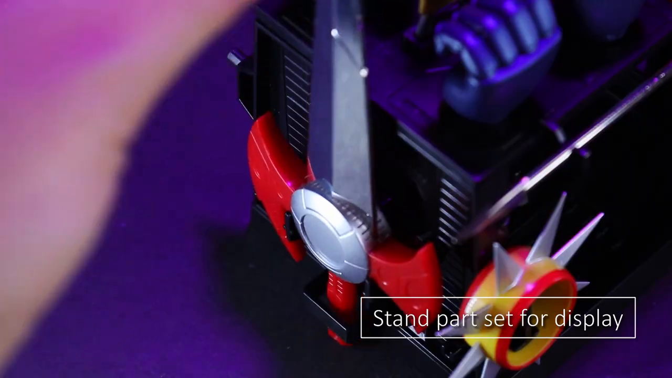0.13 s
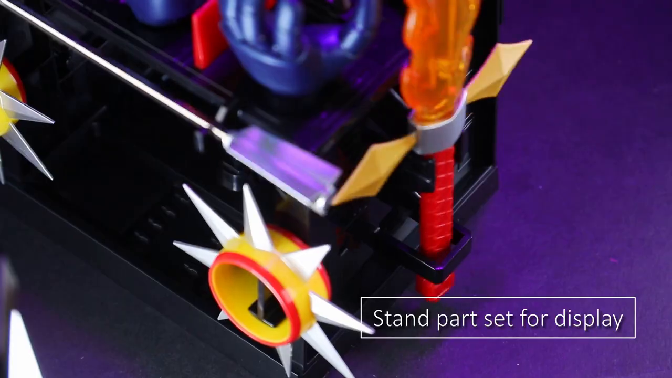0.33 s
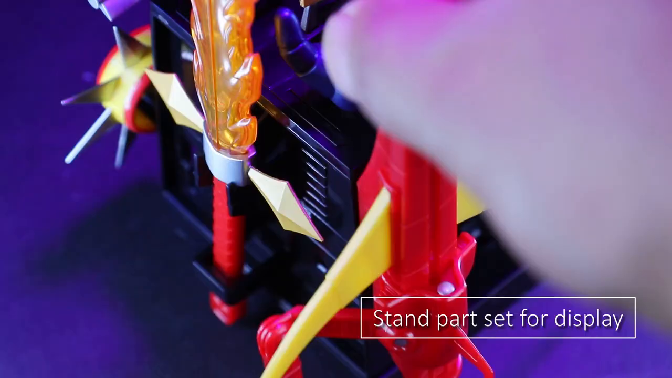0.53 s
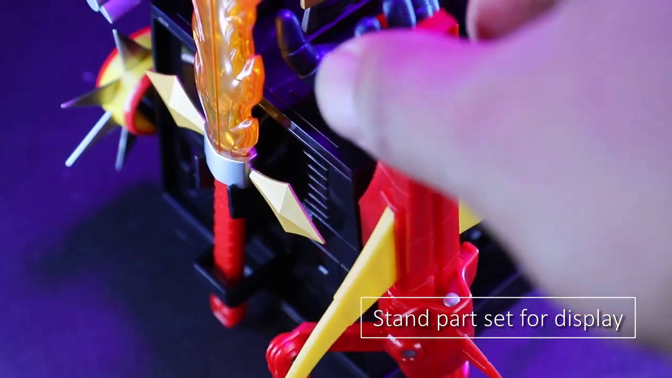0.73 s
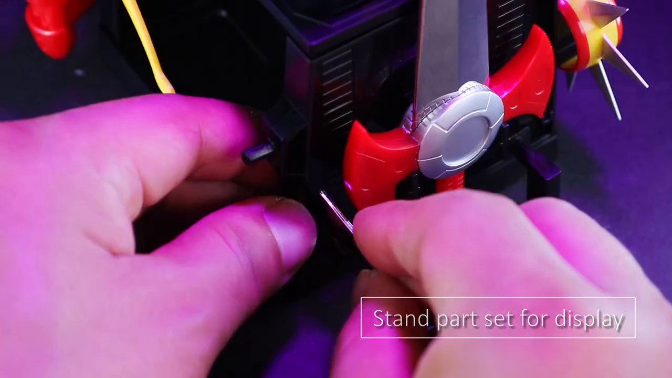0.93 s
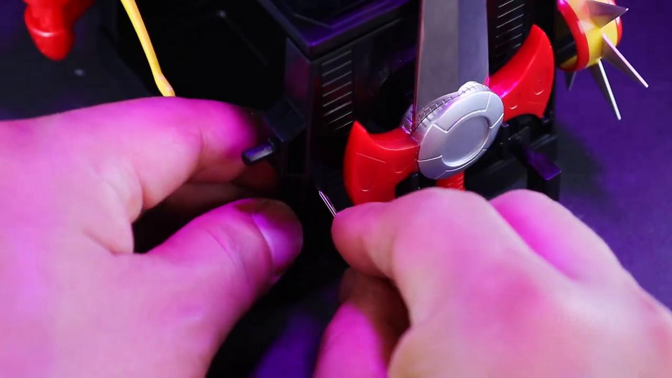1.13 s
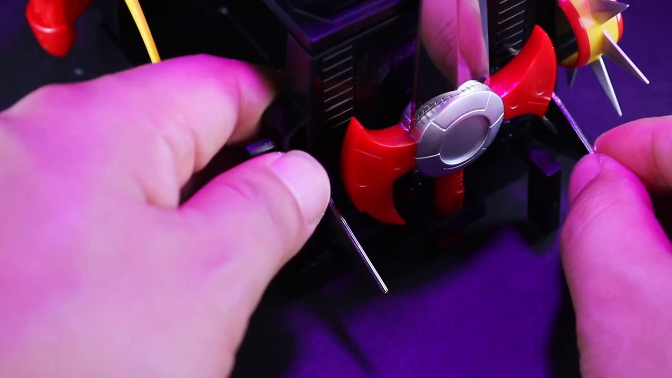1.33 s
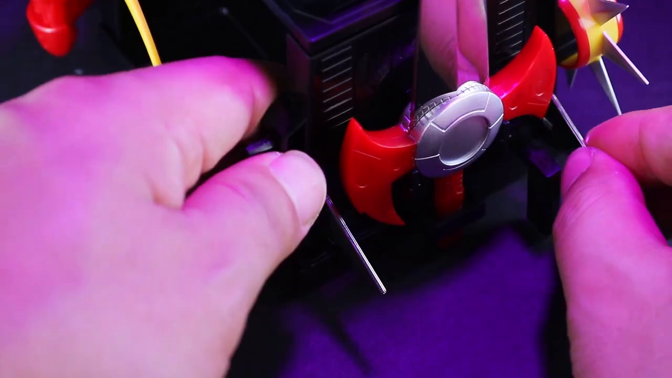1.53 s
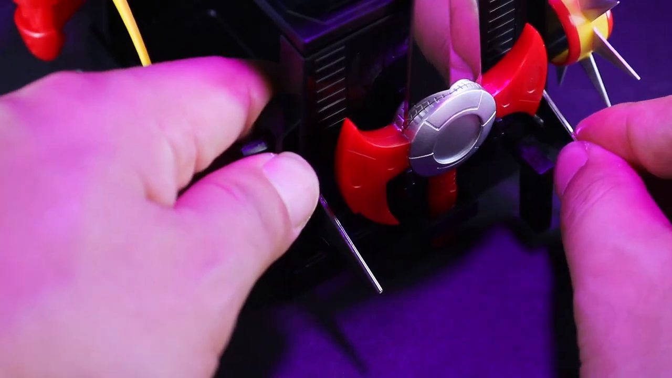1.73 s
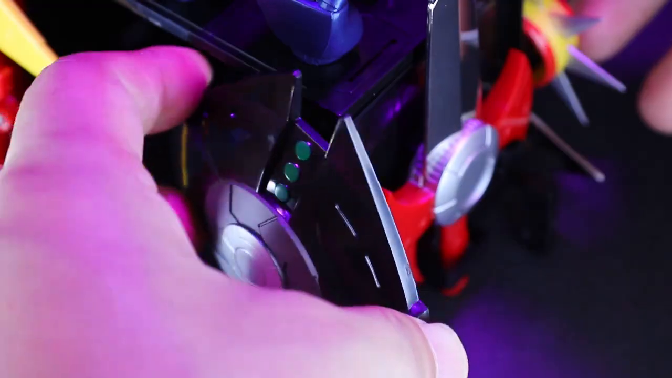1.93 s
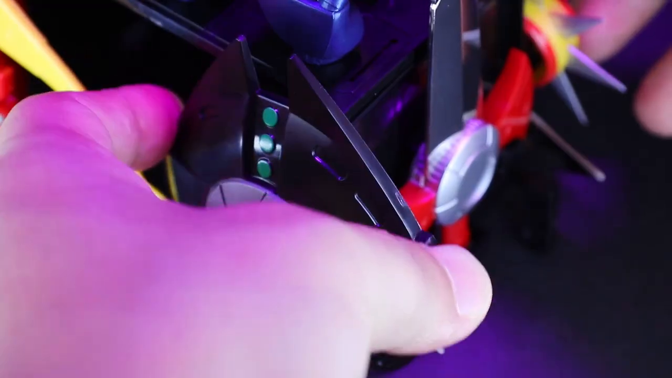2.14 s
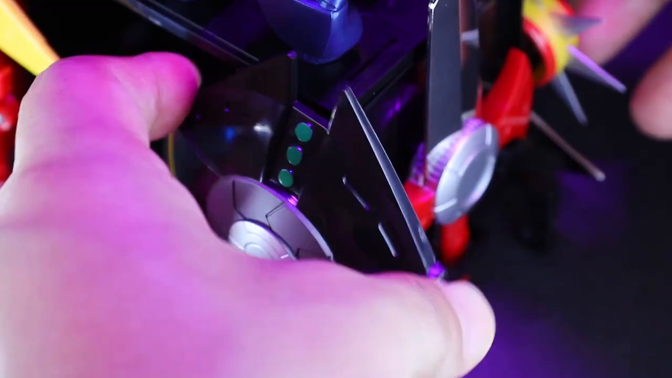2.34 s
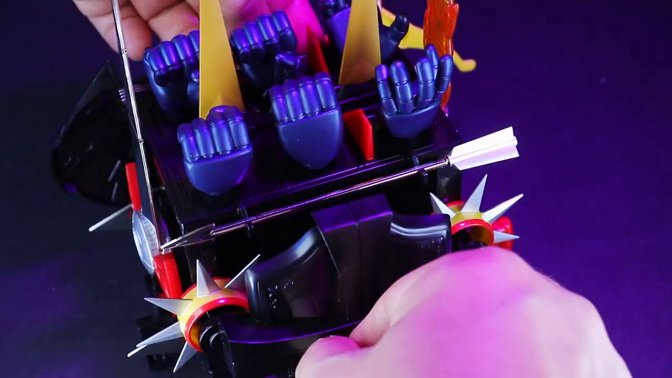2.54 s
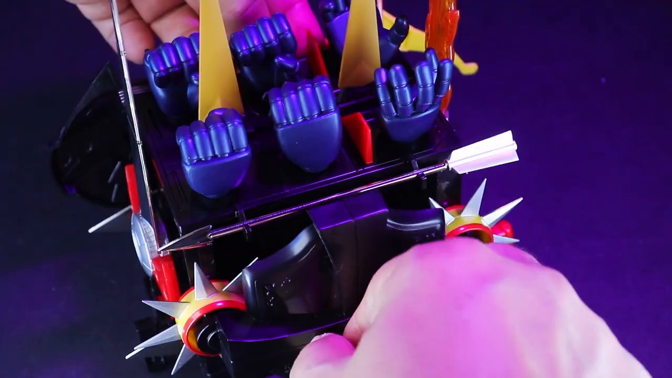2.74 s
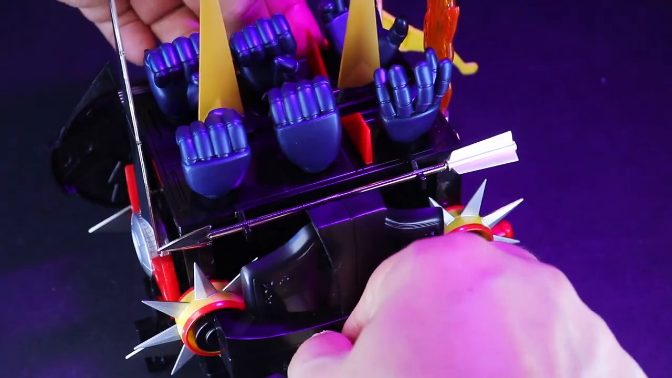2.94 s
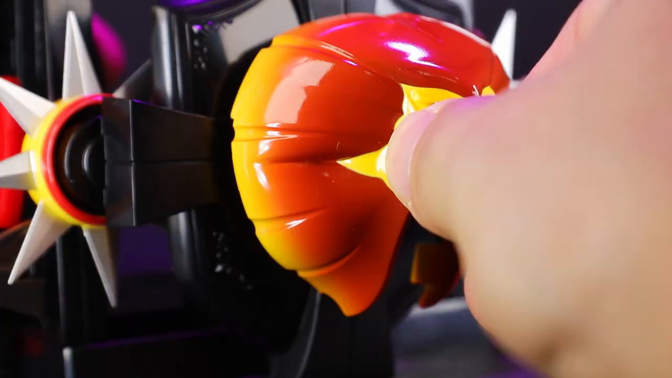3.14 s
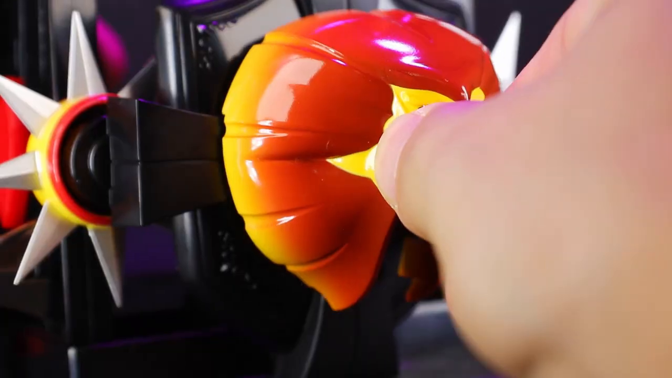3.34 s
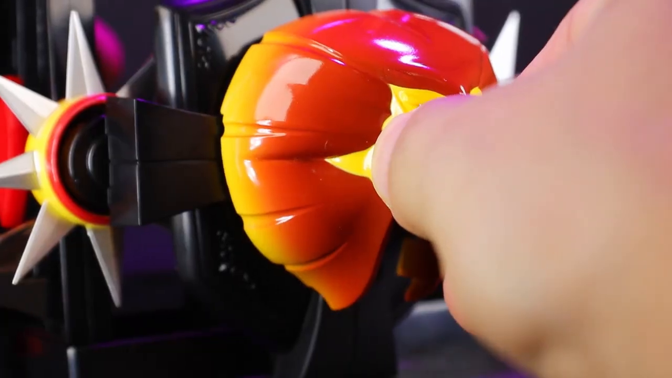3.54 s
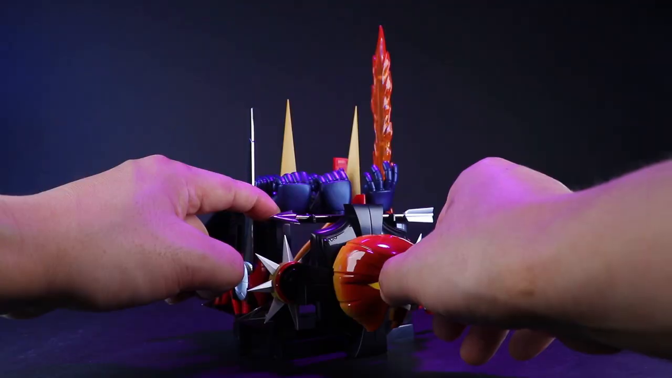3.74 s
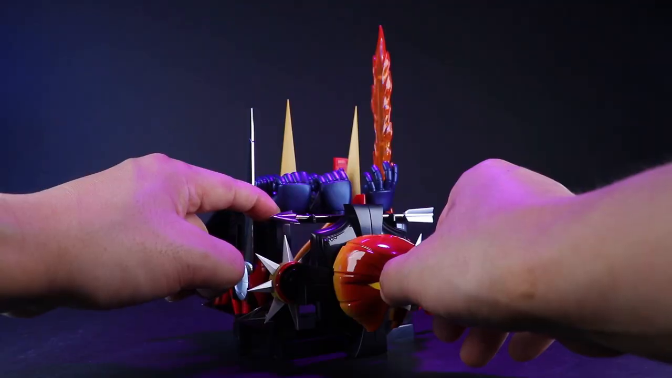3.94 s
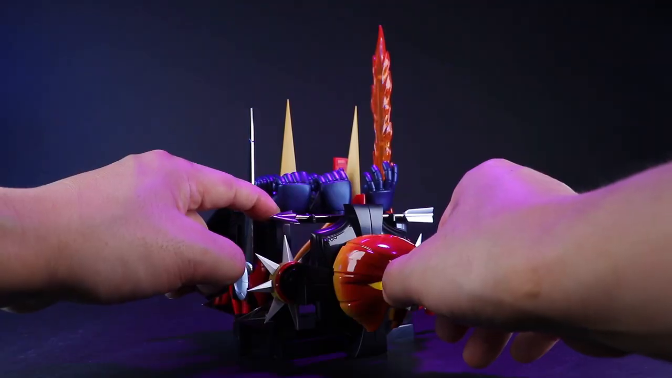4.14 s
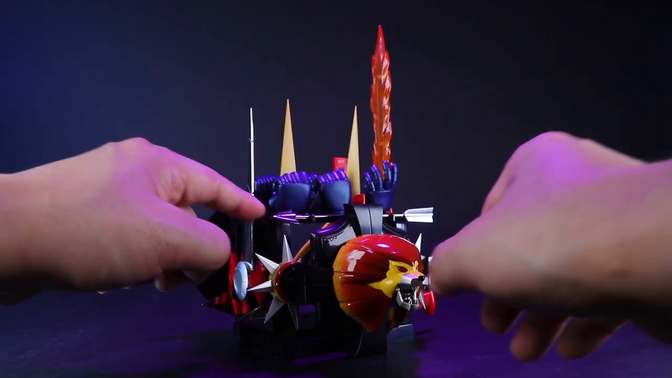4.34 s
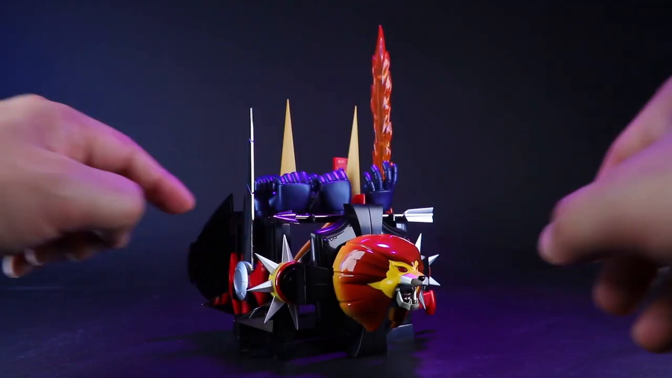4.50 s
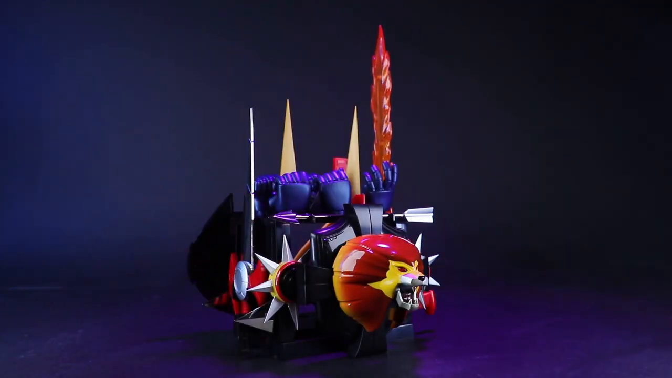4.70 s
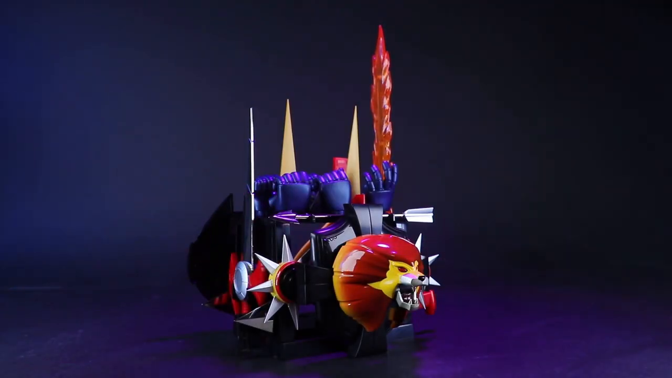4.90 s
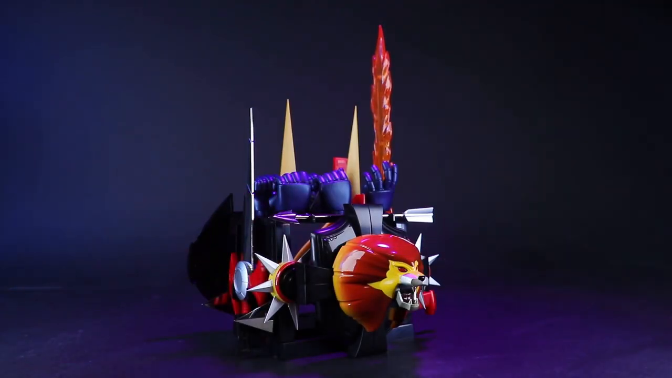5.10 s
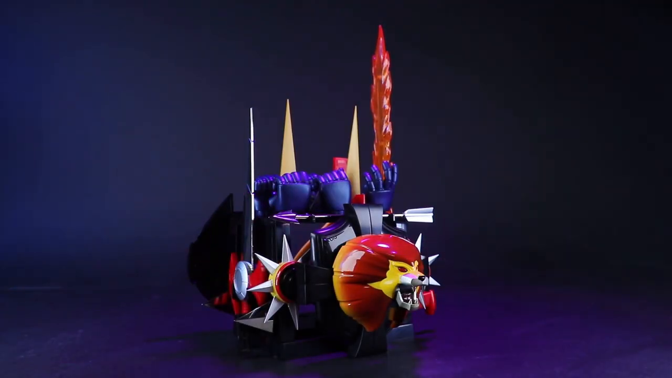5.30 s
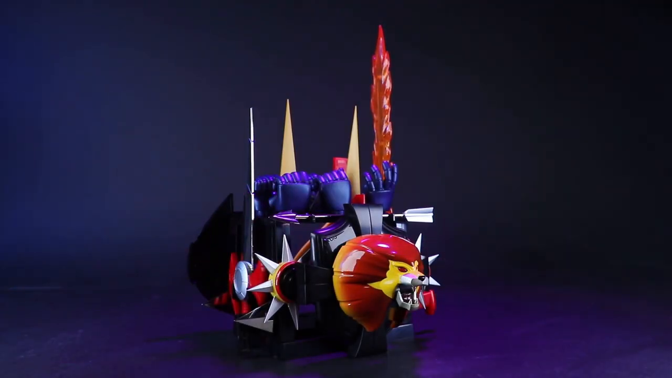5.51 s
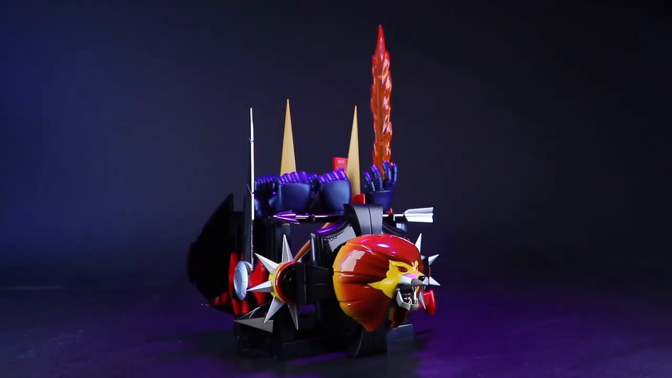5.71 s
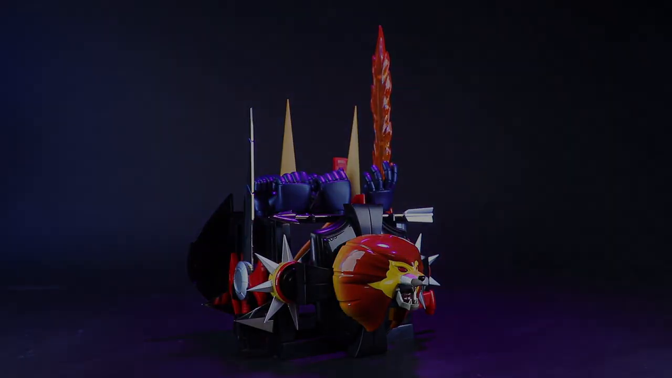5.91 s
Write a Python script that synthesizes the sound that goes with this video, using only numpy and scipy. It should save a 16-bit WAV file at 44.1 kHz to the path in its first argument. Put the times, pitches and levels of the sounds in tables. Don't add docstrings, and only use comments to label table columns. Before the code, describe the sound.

Close, dry clacks of toy weapons and a figure head fitted to a plastic stand, with faint finger rubs, fading to near silence.

```python
import sys
import numpy as np
from scipy import signal
from scipy.fft import rfft, irfft
from scipy.io import wavfile
from scipy.ndimage import uniform_filter1d

SR = 44100
rng = np.random.default_rng(int(sys.argv[2]) if len(sys.argv) > 2 else 0)


def ratio_of_db(decibels):
    return 10 ** (np.asarray(decibels, float) / 20)


def master_out(mix):
    frames = np.transpose(np.atleast_2d(mix))
    ceiling = np.clip(frames, -1, 1)
    pcm = np.round(ceiling * 32767).astype(np.int16)
    wavfile.write(sys.argv[1], SR, pcm)


N = 267231
T = np.arange(N) / SR

# start t/s, hush gain/dB
TAKES = [(0, 0), (.19, 0), (.70, 0), (.98, 0), (1.395, -.5), (1.888, 0), (2.63, 0), (3.195, 0), (3.66, -1),
         (4.5, -1.5)]
# t/s, part peak level/dB, stand over part/dB,
# brightness over part/dB
SNAPS = [(0.001, -34.5, 6, -41), (0.101, -32, -15, -16), (0.226, -49, -15, -23), (0.295, -40.5, 0, -14),
         (0.407, -7, -11, -10), (0.427, -13.5, -4, -8), (0.462, -14, -0.5, -5.5), (0.484, -22.5, 3, -8.5),
         (0.7875, -8.5, -15.5, -14), (0.947, -40, -24, -7), (1.116, -38, -13, -9), (1.246, -47, -29, -20),
         (1.299, -27.5, -14.5, -21), (1.333, -23, -9, -13), (1.343, -23.5, -40, -32), (1.641, -46, -23, 5),
         (1.819, -46.5, -33, -25),
         (1.94, -27, -35, -10), (1.95, -37, -17, -15), (2.009, -34, -5.5, -26), (2.069, -34, -5, -43),
        (2.125, -31.5, -5, -32), (2.153, -50, 6.5, -0.5), (2.264, -32, -11, -11), (2.311, -35, -8, -31),
        (2.349, -53, 8.5, -16), (2.451, -48.5, -1, -20), (2.472, -43.5, -21, -11), (2.816, -32, 4, 0),
        (2.846, -25.5, 0, -4.5), (2.872, -36, 0, -0.5), (2.889, -25.5, -3.5, -45), (2.968, -46.5, -14, -20),
        (3.014, -31.5, 3, 1), (3.044, -33, 1, -28), (3.109, -12.5, -15, 0),
         (3.225, -22, -8.5, -5), (3.314, -6, -12.5, -7), (3.455, -28.5, 2, 0), (3.479, -28.5, 1.5, -15),
          (3.574, -30, -10.5, 0.5), (3.607, -38, -4, 0), (3.722, -53, 11, -16), (4.276, -48.5, 1.5, 0.5),
          (4.403, -46, -13.5, -0.5)]
# t/s, part peak level/dB, stand over part/dB, brightness over part/dB, rattle/ms
SLIDES = [(0.094, -33.5, 1.5, -34, 8.1), (0.3704, -30.5, -19, -27, 1.25), (0.4012, -7.5, -6, -2, 2.3),
          (0.724, -35, -19.5, -3, 11.2), (.796, -33, 2, -4, 5.1), (1.69, -52, 12, -10, 12),
          (1.892, -54, 9, -2, 5), (2.184, -56, -6, -1, 6), (2.549, -45, -3, -5.5, 15),
          (2.63, -42.5, 10.5, 0, 1.8), (2.645, -42, 4.5, -2, 3.7), (2.665, -45, -4, 0, 2.9),
          (2.749, -32.5, -0.5, 3.5, 4), (2.78, -37, 8, -12, 14.5), (2.90, -47, 13.5, -17, 8.3),
          (3.279, -34.5, -6, -7.5, 17), (3.306, -1.5, -20.5, -3, 2.32), (3.47, -43, 10.5, 7.5, 9.3),
          (3.564, -35, -2, -4.5, 0.94), (5.189, -46.5, -17, 9.5, 4.5), (5.197, -46, -10, 8, 9.9)]
# t/s, part peak level/dB
SETTLING = [(.432, -28.5), (.47, -23.5), (3.325, -23.5), (3.342, -23), (3.363, -26.5), (3.404, -28)]
SNAP_RATTLE_MS = 2.376
SETTLE_STAND_DB, SETTLE_BRIGHT_DB, SETTLE_RATTLE_MS = -7.5, -2.5, 8.35

PART_STARTS = [
    0,
    .70,
    .98,
    1.90,
    2.63,
    3.195,
    3.44,
    3.55,
    4.0,
]
PART_GRIT_DB = [10, 3.8, 8.1, 6.8, 10.2, 15, 15, 14.5, 18]
PART_FIZZ_DB = [1.5, -2, 2, -6, -3.5, -2, -11, -1.5, -1.5]
PART_STRETCH = [0.98, 1, 0.67, 0.74, .66, 0.57, 0.95, 0.66, .65]
SLIDE_STRETCH = 0.8
HELD = 0.82
GRIT_T60_S = 0.069

# f/Hz, level/dB, t60/s
SWORD_MODES = [(618, 2.5, 0.11), (764, 14, 0.056), (879, 0.5, 0.088), (1265, 0.5, .07), (1611, 1, 0.095),
               (1917, -1, 0.052), (3600, -15.5, .035), (5830, 9.5, 0.018), (8400, -1.5, 0.087),
               (8300, 0, 0.037)]
# f/Hz, level/dB, t60/s
HILT_MODES = [(877, 8, 0.034), (1012, 12, 0.013), (1780, -32, 0.086), (2900, -7, 0.046), (3300, -21, 0.046),
              (4830, -18, .02)]
# f/Hz, level/dB, t60/s
ROD_MODES = [(1015, 0.5, 0.1), (1220, 5, 0.072), (1311, -5, 0.16), (1590, -5.5, 0.056), (2400, -24, 0.034),
             (4160, -16, 0.025), (6460, 3, 0.042)]
# f/Hz, level/dB, t60/s
SHIELD_MODES = [(614, 8, 0.026), (870, 6, 0.044), (1000, -1, 0.043), (1370, -3, 0.047), (2500, 4.5, 0.065),
                (3500, -10, .03)]
# f/Hz, level/dB, t60/s
CLAMP_MODES = [(688, -15, 0.19), (1200, -2, 0.14), (1390, -20, 0.11), (1780, -24, 0.14), (2640, 9.5, 0.016),
               (3450, 2, 0.028), (7700, -21, .02)]
# f/Hz, level/dB, t60/s
HEAD_MODES = [(872, -17.5, 0.15), (1018, -13.5, 0.15), (1209, 1.5, 0.087), (1411, -7, 0.16),
              (1675, 2, 0.031), (1922, -9.5, 0.13), (2500, 1.5, 0.058), (2820, 0, 0.18), (3768, 0.5, 0.076),
              (6330, -9, 0.027), (7900, -14, .03)]
# f/Hz, level/dB, t60/s
FAR_MODES = [(944, -20.5, 0.039), (1870, -2, 0.16), (2500, 9, 0.033), (4490, 9.5, 0.038),
             (8100, -1.5, 0.043)]
# f/Hz, level/dB, t60/s
STAND_MODES = [(233, -25, 0.031), (306.8, -12.5, .09), (410.9, -2, 0.2), (498.8, -4, 0.097),
               (566, -9.5, 0.11), (735.7, -10.5, 0.15), (865, -4, 0.027), (1210, -4, 0.027)]

# t/s, level/dB, f/Hz, t60/s
PINGS = [(.296, -37, 2280, 0.037), (.374, -40.5, 3600, 0.07), (.7995, -23.5, 920, .13),
         (.825, -27.5, 908, .14), (.947, -44, 2400, .04), (1.64, -30, 4520, 0.019), (1.70, -38.5, 825, .12),
         (2.187, -48.5, 3430, .1), (2.552, -48.5, 1980, .05), (2.968, -47, 2900, .05),
         (3.112, -20, 3500, 0.063), (3.112, -18.5, 1220, 0.1), (3.28, -50, 2500, 0.092),
         (3.255, -34, 11000, .05), (3.575, -49, 12300, .04), (3.58, -36, 8400, .15),
         (3.72, -39.5, 1200, 0.057), (4.277, -43, 1870, 0.083)]
# t/s, peak level/dB, f/Hz
TICKS = [(5.762, -30.5, 13000), (5.786, -42, 9020), (5.805, -37.5, 9200), (5.879, -44, 8500),
         (5.918, -31.5, 6970), (5.92, -32.5, 14800), (5.9735, -33, 3850)]
# t/s, level/dB
RUBS = [(0.0, -31.5), (0.15, -61), (0.48, -43.5), (0.72, -51.5), (1.1, -53.5), (1.42, -66), (1.65, -48),
        (2.14, -49), (2.4, -62.5), (2.65, -39), (2.73, -47), (2.8, -30), (3.14, -56), (3.3, -34),
        (3.45, -37.5), (3.64, -51), (4.37, -58), (4.9, -55)]
# peak t/s, level/dB, fall t60/s
SCRAPES = [(.48, -38, .37), (2.58, -77, .9), (3.23, -62, .9), (3.3, -61, 1.1), (3.6, -59.5, .25)]
# peak t/s, level/dB, fall t60/s
ARMS = [(0.0, -47, .11), (.13, -49, 0.25), (.41, -32, .4), (.49, -40, 0.27), (.8, -35, 0.21),
        (1.35, -62, 1), (2.34, -42, 0.11), (2.65, -47, 0.41), (2.8, -48, .6), (2.88, -36.5, 0.096),
        (3.02, -34, .21), (3.105, -40, 0.29), (3.31, -25, 0.35), (3.48, -35.5, 0.41), (3.73, -50.5, 1.6),
        (3.86, -34.5, 0.26), (3.92, -46.5, 2.15), (4.21, -42.5, 1.6), (4.7, -48.5, 1.3),
        (5.205, -44.5, 0.24), (5.4, -47, 3)]
ARM_RISE_T60_S, SCRAPE_RISE_T60_S = 0.08, 0.3

# f/Hz, t60/s
ROOM = [(100, 0.14), (400, 0.3), (1500, 0.22), (5000, 0.19), (10000, 0.2), (16000, 0.074)]
ROOM_DB, ROOM_GAP_S = -11, 0.0064
# f/Hz, level/dB per Hz
HUSH = [(20, -19.5), (45, 1), (90, -9), (160, -4.5), (300, -9.5), (500, -7), (700, -13), (1400, -12),
        (2000, -18), (3600, -20.5), (5000, -27), (6300, -22.5), (9000, -21.5), (15400, -28)]
HUSH_DB = -52.5
# t/s, level/dB
WHINE = [(0, -58), (2.63, -63), (3.195, -62), (4.5, -60)]
WHINE_HZ = 15576.6
TOP_HZ = 15720


def snaps():
    out = np.zeros(N + SR)
    settling = [(*row, SETTLE_STAND_DB, SETTLE_BRIGHT_DB, SETTLE_RATTLE_MS) for row in SETTLING]
    for row in SNAPS:
        place(out, row[0], snap(*row, SNAP_RATTLE_MS, slide=False))
    for row in SLIDES + settling:
        place(out, row[0], snap(*row, slide=True))
    return out[:N]


def snap(s, part_db, stand_db, bright_db, rattle_ms, slide):
    parts = [SWORD_MODES, HILT_MODES, ROD_MODES, SHIELD_MODES, CLAMP_MODES,
             HEAD_MODES, HEAD_MODES, HEAD_MODES, FAR_MODES]
    k = np.searchsorted(PART_STARTS, s, "right") - 1
    stretch = SLIDE_STRETCH if slide else PART_STRETCH[k]
    t = T[:6500]
    hits = contacts(rattle_ms, slide)
    body = ring(parts[k], t, stretch, 1.3, 0.035) + ring(STAND_MODES, t, HELD * stretch, 4.0, 0.035)
    if slide:
        body = signal.fftconvolve(body, hits)[:len(t)]
    grit_power = signal.fftconvolve(fade(t, GRIT_T60_S * stretch) ** 2, hits ** 2)[:len(t)]
    grit = np.sqrt(np.abs(grit_power)) * band(rng.standard_normal(len(t)), 810, 7600)
    hit = body + ratio_of_db(PART_GRIT_DB[k] + 1.5 * slide) * grit
    part, stand = band(hit, 544, 1745), band(hit, 277, 620)
    crack, fizz = band(hit, 2350, 4630), band(hit, 5510, 15000)
    balance = [(part, 0), (stand, stand_db), (crack, bright_db), (fizz, bright_db + PART_FIZZ_DB[k])]
    return sum(ratio_of_db(part_db + over_db) * x / top_rms(x) for x, over_db in balance)


def contacts(rattle_ms, slide):
    age = T[:3000] * 1000 / rattle_ms
    chance, force = rng.standard_normal((2, len(age)))
    hits = (chance > 1.9) * force * np.exp(-age) * (age if slide else 0.3)
    hits[0] = 0.15 if slide else 1.3
    return hits


def ring(modes, t, stretch, scatter_db, spread):
    hz, db, t60 = np.repeat(np.transpose(modes), 3, axis=1)[:, :, None]
    level_luck, pitch_luck, late = rng.standard_normal((3, len(hz), 1))
    side = np.arange(len(hz))[:, None] % 3 - 1
    t60 = np.minimum(t60 * stretch, 3.4 / np.sqrt(hz))
    hz = hz * (1 + spread * (side + 0.53 * pitch_luck))
    level = ratio_of_db(db + scatter_db * level_luck - 9 * abs(side))
    waves = np.sin(2 * np.pi * hz * t + 1.61 * late * side)
    onset = 1 - fade(t, 0.0029)
    return np.sum(level * fade(t, t60) * waves, axis=0) * onset


def pings():
    out = np.zeros(N + SR)
    for s, db, hz, t60 in PINGS:
        place(out, s, ring([(hz, db, t60)], T[:8000], 0.71, 0, 0.013))
    return out[:N]


def ticks():
    out, t = np.zeros(N + SR), T[:400]
    for s, db, hz in TICKS:
        start = int(s * SR)
        out[start:start + len(t)] += ratio_of_db(db + 7) * np.sin(2 * np.pi * hz * t) * fade(t, 12 / hz)
    return out[:N]


def hands():
    jerks = rng.standard_normal(N) * ratio_of_db(1.3 * rng.exponential(size=N))
    slips = jerks * (rng.random(N) < 0.03)
    return finger_rub(slips) + skin_scrapes(slips) + forearms()


def finger_rub(slips):
    rung = signal.fftconvolve(slips, ring(STAND_MODES, T[:6000], 0.46, 0, 0.087))[:N]
    rub = unit(rung) + 0.63 * unit(band(slips, 310, 910))
    rub *= ratio_of_db(2.9 * walk(24))
    return ratio_of_db(np.interp(T, *np.transpose(RUBS)) - 6) * unit(rub)


def skin_scrapes(slips):
    hiss = band(slips + 0.8 * rng.standard_normal(N), 2200, 10000)
    return swells(SCRAPES, SCRAPE_RISE_T60_S) * unit(hiss)


def forearms():
    rumble = band(rng.standard_normal(N), 83, 330) * ratio_of_db(2.0 * walk(25))
    return ratio_of_db(-3.5) * swells(ARMS, ARM_RISE_T60_S) * unit(rumble)


def room(dry):
    t, tail = T[:SR // 2], 0
    room_hz, room_t60 = np.transpose(ROOM)
    for hz in 125 * 2. ** np.arange(7):
        t60 = np.interp(np.log(hz * np.sqrt(2)), np.log(room_hz), room_t60)
        tail = tail + band(rng.standard_normal(len(t)), hz, 2 * hz) * fade(t, t60)
    tail = tail * (1 - np.exp(-t / ROOM_GAP_S))
    tail = ratio_of_db(ROOM_DB) * tail / np.sqrt(np.sum(tail ** 2))
    edges = [int(row[0] * SR) for row in TAKES[1:]]
    return np.concatenate([signal.fftconvolve(x, tail)[:len(x)] for x in np.split(dry, edges)])


def hush():
    hz, db = np.transpose(HUSH)
    bins = np.arange(N // 2 + 1) * SR / N + 1
    colour = ratio_of_db(np.interp(np.log(bins), np.log(hz), db))
    noise = unit(irfft(rfft(rng.standard_normal(N)) * colour, N))
    whine = np.sqrt(2) * np.sin(2 * np.pi * WHINE_HZ * T) * ratio_of_db(stepped(WHINE) + 0.5 * walk(3.8))
    return noise * ratio_of_db(HUSH_DB + stepped(TAKES) + 0.21 * walk(6.3)) + whine


def place(out, s, sound):
    end = min([row[0] for row in TAKES if row[0] > s] + [N / SR])
    start = int(s * SR)
    out[start:start + len(sound)] += sound * (s + T[:len(sound)] < end)


def stepped(table):
    starts, db = np.transpose(table)
    return db[np.searchsorted(starts, T, "right") - 1]


def swells(rows, rise_t60):
    power = 0
    for s, db, t60 in rows:
        power = power + (ratio_of_db(db) * fade(abs(T - s), np.where(T < s, rise_t60, t60))) ** 2
    return np.sqrt(power)


def walk(rate):
    k = int(SR / rate)
    steps = np.repeat(rng.standard_normal(N // k + 1), k)
    return unit(uniform_filter1d(steps, k)[:N])


def fade(t, t60):
    return np.exp(-np.log(1000) * t / t60)


def band(x, lo_hz, hi_hz):
    return signal.sosfilt(signal.butter(2, [lo_hz, hi_hz], "band", fs=SR, output="sos"), x)


def unit(x):
    return x / np.sqrt(np.mean(x ** 2) + 1e-30)


def top_rms(x):
    return np.sqrt(uniform_filter1d(x ** 2, size=176).max())


def scene():
    near = snaps() + pings() + ticks() + hands()
    return (near + room(near) + hush())[None]


def low_pass(x):
    return signal.sosfilt(signal.butter(12, 15800, fs=SR, output="sos"), x)


def record(dry):
    top_cut = signal.ellip(12, 0.2, 70, TOP_HZ, fs=SR, output="sos")
    mix = np.clip(signal.sosfilt(top_cut, dry), -0.98, 0.98)
    return low_pass(mix)


dry = scene()
out = record(dry)
master_out(out)
```